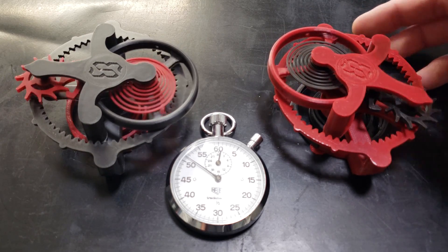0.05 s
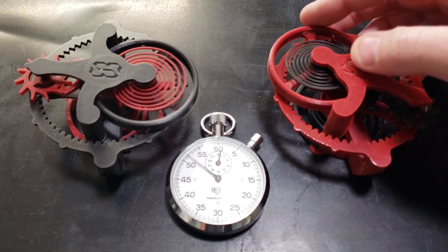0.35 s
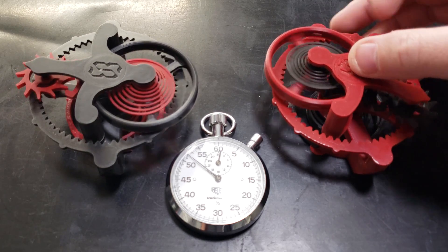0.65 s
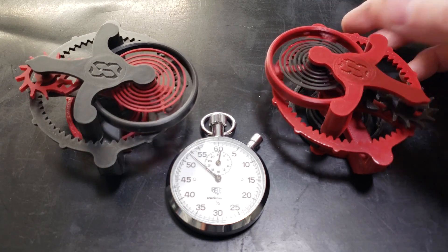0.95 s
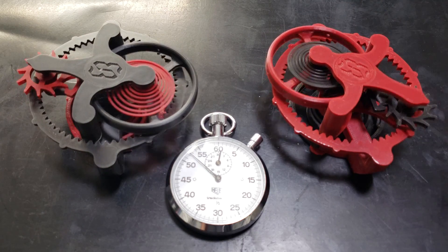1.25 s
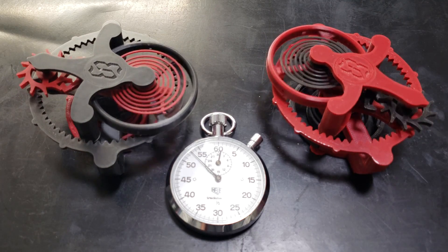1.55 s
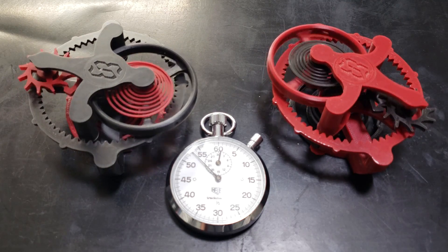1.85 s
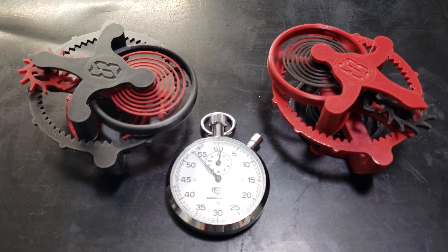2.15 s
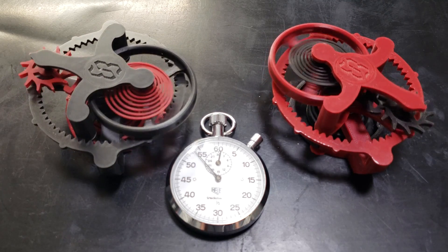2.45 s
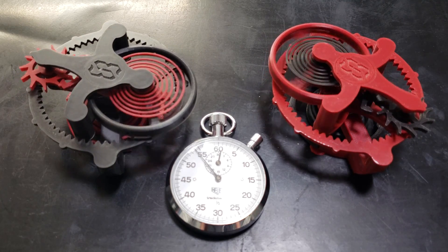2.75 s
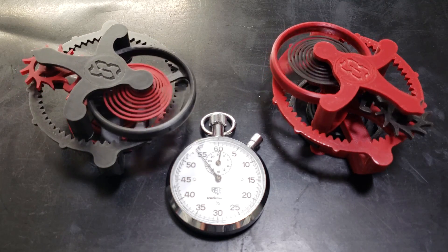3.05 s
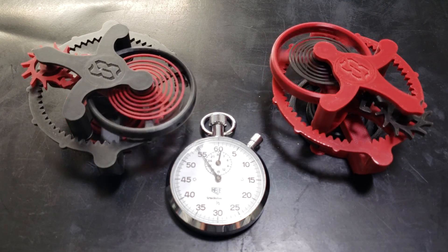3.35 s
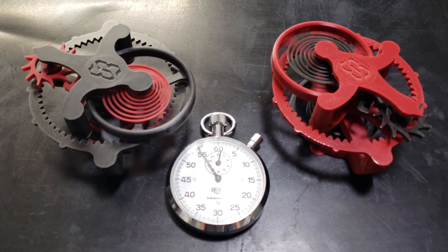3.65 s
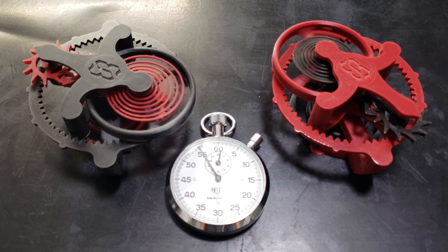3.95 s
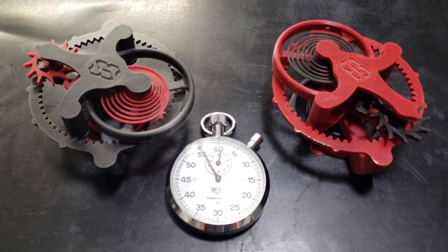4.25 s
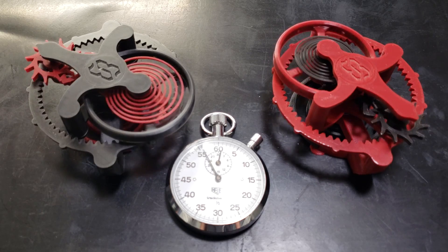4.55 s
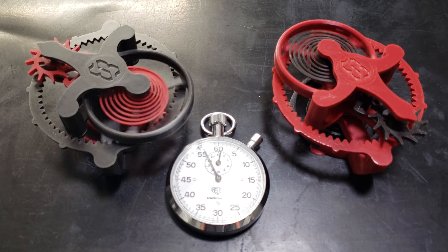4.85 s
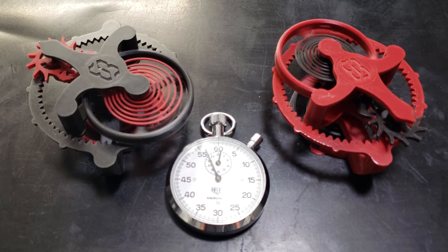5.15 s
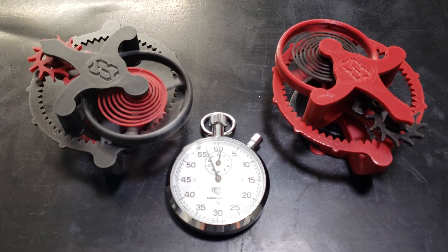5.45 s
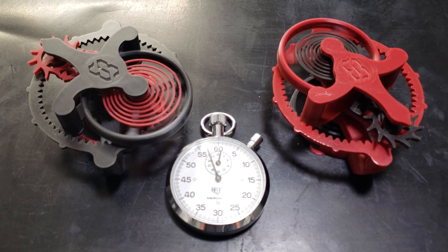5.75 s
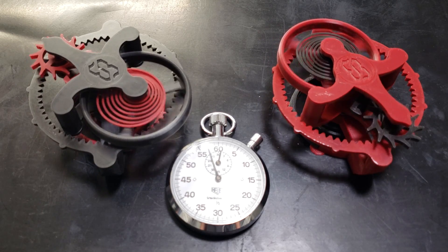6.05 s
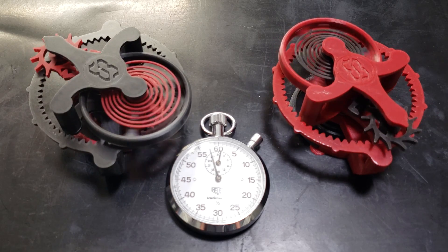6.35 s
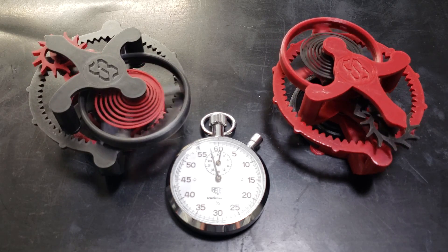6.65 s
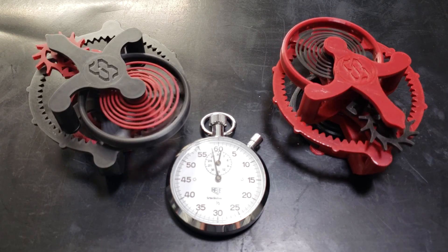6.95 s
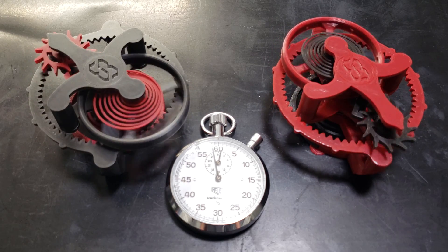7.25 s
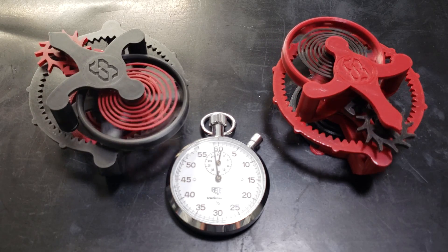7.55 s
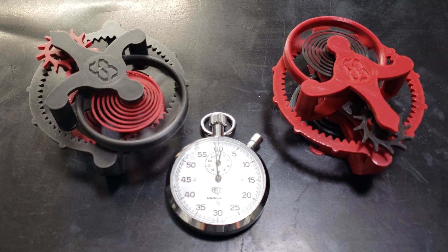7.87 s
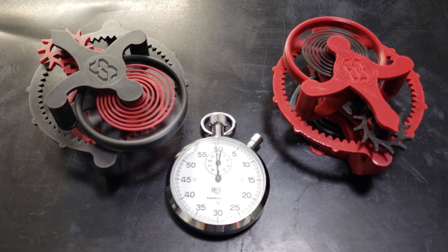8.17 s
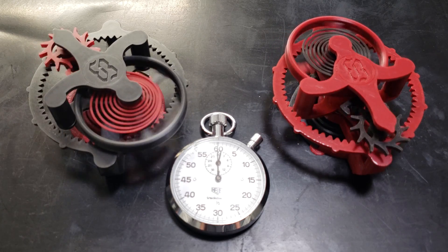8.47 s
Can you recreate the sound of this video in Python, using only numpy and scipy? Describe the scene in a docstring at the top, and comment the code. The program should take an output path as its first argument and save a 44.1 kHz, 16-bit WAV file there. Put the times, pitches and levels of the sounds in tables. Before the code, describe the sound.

Two small plastic clockwork mechanisms tick on a workbench in a small room, heard close up. One, to the left, has a slightly scratchy click; the other, near the centre, joins a moment later, cleaner and a little faster. Each ticks in limping pairs, so the beats drift through each other, knocking lightly on the bench. A soft, low bump comes early, and the ticking carries on over very faint hiss.

```python
"""Two clockwork escapements on a workbench

Two 3D-printed escapements tick in a small room, a grey one on the left, a red one to its right. Their
balance wheels swing at different rates, so the beats drift through each other. Each beat is a light
unlocking click, a short slide and the sharp drop of a tooth on a pallet, which knocks the bench too.
A hand lets go of the red one with a soft bump; rumble, hum and hiss lie far underneath."""
import sys
import numpy as np
from scipy import signal
from scipy.fft import rfft, irfft
from scipy.io import wavfile

SR = 44100
rng = np.random.default_rng(int(sys.argv[2]) if len(sys.argv) > 2 else 0)


def file_out(sig):
    """Save sig as 16-bit WAV at sys.argv[1]."""
    # one column per channel
    cols = np.atleast_2d(sig).T
    # limit, then scale
    lim = np.clip(cols, -1, 1)
    pcm = np.round(lim * 32767).astype(np.int16)
    wavfile.write(sys.argv[1], SR, pcm)


N = 379701
TIME = np.arange(N) / SR
FREQ = np.maximum(np.fft.rfftfreq(4096, 1 / SR), 1)
SIDES = np.array([[1], [-1]])  # sign of a stereo difference: left, right


def grey_escapement():
    """The left movement: a scratchy slide into each tick, and a fork that rattles between beats."""
    # Tooth drops, entry and exit pallet in turn: start_s, level_db, treble_db, rub_db (unlocking)
    beats = [(0.026, 8, 6, -1), (0.247, 3.5, 4, -59), (0.622, 7, 7.5, 2), (0.843, 5, 5, -34),
             (1.22, 12, 14.5, -1), (1.437, 2.5, -3, 0), (1.812, 3, -1.5, 1.5), (2.037, 7.5, 9.5, -23),
             (2.418, 8.5, 11, -1.5), (2.633, 4.5, 9.5, -24), (3.009, 5, 12.5, 4), (3.229, 3.5, 8, -39),
             (3.609, 6, 2.5, -1), (3.821, 3, 3, -2.5), (4.193, 6.5, 4.5, 6), (4.412, 3, 8.5, -1),
             (4.783, 6, 5, 1.5), (5.005, 2.5, 0, -24), (5.384, 10, 13, 3), (5.601, 0.5, 6, -24.5),
             (5.981, 3.5, 3.5, 4), (6.195, 6.5, 5.5, -24), (6.568, 4, 3.5, -2), (6.791, 6, 6, -29),
             (7.168, 7.5, 5.5, 1), (7.387, 4, 3, -15), (7.766, -2.5, -1.5, -2), (7.976, 3, 1.5, -18),
             (8.366, 5.5, 3, 4), (8.571, 9.5, 9.5, -32)]
    # The balance meets the fork, then the fork frees the tooth: lead_s, level_db
    unlock = [(.02, -19.5), (.008, -13)]
    # Broad colour of the plastic frame: freq_hz, gain_db
    body = [(200, -45.5), (1000, -27.5), (2000, -19.5), (3000, -21.5), (4200, -3.5), (6000, -7),
            (7500, -1.5), (8700, -9.5), (10500, -2.5), (13500, -9.5), (15300, 2), (16500, -29)]
    # Resonances of fork and escape wheel: pitch_hz, width_hz, boost_db
    modes = [(3820, 430, 1.5), (5520, 410, 6.5), (12120, 570, 13.5), (16000, 1000, 3.5)]
    clicks = fork_clicks(beats, unlock, slowing_per_s=0.0035, treble_db=-0.5)
    clicks += swing_clicks(beats, level_db=-26.5, treble_db=15, sag_db_per_s=1.5)
    ticks = escapement(beats, clicks, body, modes, ring_t60=0.016, click_t60=0.014, treble_ring=0.75,
                       slide_s=0.0031, slide_gain_db=-12.5, chatter_db=5)
    knocks = kicks(beats, entry_db=-30.5, exit_db=-38.5, sag_db_per_s=0.37, dullness=0.49)
    clacks = kicks(beats, entry_db=-17, exit_db=-20, sag_db_per_s=0.67, dullness=0.18)
    thuds = bench(beats, knocks, clacks, clack_t60=0.034, swell_s=0.0047)
    return place(undb(-4.5) * ticks + thuds, pan_db=7.5, late_s=.00022)


def red_escapement():
    """The movement near the centre: cleaner ticks with hardly any slide."""
    # Tooth drops, entry and exit pallet in turn: start_s, level_db, treble_db, rub_db (unlocking)
    beats = [(0.677, 7.5, -3, -5), (0.864, 3, -0.5, -17.5), (1.24, 8.5, 3, -8), (1.421, 5.5, 9, -25.5),
             (1.791, 8, 9, 1.5), (1.972, 4, 5, 3.5), (2.347, 7.5, 3.5, 1), (2.527, 2, -1.5, 1.5),
             (2.9, 5, 2, 1), (3.072, 3.5, -1, 1), (3.45, 7, 4, -1.5), (3.608, 1, 0, -7),
             (3.988, 0.5, 0.5, 3), (4.147, 2.5, 2, -3.5), (4.529, 5, -0.5, 3.5), (4.688, 4.5, 1.5, -23),
             (5.066, 3, 1.5, 0), (5.226, 4, 4, -2), (5.61, 7, 1, 2), (5.763, 4.5, 5.5, 2),
             (6.15, 2.5, -4.5, 0.5), (6.298, 4, 5, -28), (6.69, 1.5, -3, 3), (6.831, 3, 5.5, -12),
             (7.228, 0.5, -7.5, -10), (7.367, 0.5, 0, -9), (7.773, 4.5, -1, -6), (7.904, -1.5, 1, -26),
             (8.309, 7.5, 3.5, -4.5), (8.446, 3.5, -1, 1.5)]
    # The two unlocking clicks: lead_s, level_db
    unlock = [(.025, -24.5), (.0095, -16)]
    # Broad colour of the plastic frame: freq_hz, gain_db
    body = [(200, -35), (1000, -39), (2000, -22), (3000, -24), (4500, -9), (6000, -7.5), (7500, -4.5),
            (8700, -2), (10500, 1), (13500, 6), (15300, 1), (16500, -12)]
    # Resonances of fork and escape wheel: pitch_hz, width_hz, boost_db
    modes = [(6970, 570, 4.33), (10300, 490, 2.4), (11615, 270, 9), (12790, 450, 8), (15050, 400, 1)]
    clicks = fork_clicks(beats, unlock, slowing_per_s=0.061, treble_db=-12.5)
    ticks = escapement(beats, clicks, body, modes, ring_t60=0.02, click_t60=0.015, treble_ring=0.54,
                       slide_s=0.0012, slide_gain_db=-25.5, chatter_db=2.5)
    knocks = kicks(beats, entry_db=-32, exit_db=-27.5, sag_db_per_s=1.67, dullness=0.36)
    clacks = kicks(beats, entry_db=-18.5, exit_db=-17, sag_db_per_s=0.93, dullness=0.22)
    thuds = bench(beats, knocks, clacks, clack_t60=.03, swell_s=0.0079)
    return place(undb(-1) * ticks + thuds, pan_db=0.5, late_s=-.00001)


def escapement(beats, clicks, body, modes, ring_t60, click_t60, treble_ring,
               slide_s, slide_gain_db, chatter_db):
    """Teeth strike two pallets in turn; each blow rings a dense cloud of short plastic modes."""
    t = np.arange(-SR // 100, SR // 30) / SR
    treble = np.clip(np.log2(bin_hz(len(t)) / 6000), 0, 1)
    own_ring = rng.standard_normal((3, 2, len(t)))  # entry pallet, exit pallet, fork
    alike, spread, rise_s = .12, .45, .0005
    peaks_db = sum(db / (1 + (2 * (FREQ - hz) / width) ** 2) for hz, width, db in modes)
    frame = response(curve(body) + peaks_db)

    def blow(part, t60, treble_db, slide_db):
        """One contact: the tooth slides with growing force, lands, and the part rings."""
        grain = np.sqrt(alike) * own_ring[part] + np.sqrt(1 - alike) * rng.standard_normal((2, len(t)))
        ridges = t[::SR // 2000]  # print ridges make the tooth chatter, about twice a millisecond
        chatter = undb(chatter_db * np.interp(t, ridges, rng.standard_normal(len(ridges))))
        slide = undb(slide_db) * unit(np.exp(-np.abs(t) / slide_s) * (t < 0) * chatter ** 2)
        landing = np.clip(t / rise_s, 0, 1) * chatter
        # plastic damps its treble sooner than its middle
        low = rfft(grain * (unit(fade(t, t60) * landing) + slide))
        high = rfft(grain * (unit(fade(t, t60 * treble_ring) * landing) + slide))
        spectrum = (low * (1 - treble) + high * treble) * undb(treble_db * treble)
        mid, side = irfft(spectrum, len(t))
        # the frame radiates a little differently to each side
        return unit(through(mid + spread * SIDES * side, frame))

    out = np.zeros((2, N))
    for k, (s, db, treble_db, rub_db) in enumerate(beats):
        add(out, s + t[0], undb(db) * blow(k % 2, ring_t60, treble_db, slide_gain_db + rub_db))
    for s, db, treble_db in clicks:
        add(out, s + t[0], undb(db) * blow(2, click_t60, treble_db, slide_db=-11.5))
    return out


def fork_clicks(beats, unlock, slowing_per_s, treble_db):
    """Cues for the light clicks before each drop; their lead grows as the balance loses speed."""
    scatter_db, lead_scatter = 5, 0.067
    clicks = []
    for s, _, _, rub_db in beats:
        for lead_s, db in unlock:
            early, force = rng.standard_normal(2)
            start_s = s - lead_s * (1 + slowing_per_s * s + lead_scatter * early)
            clicks.append((start_s, db + rub_db + scatter_db * force, treble_db))
    return clicks


def swing_clicks(beats, level_db, treble_db, sag_db_per_s):
    """Cues for the free swing shaking the fork: after each drop and, ever fainter, before entry drops."""
    after_s, before_s, scatter_db = .098, .089, 5
    outward = [(s + after_s, level_db) for s, *_ in beats]
    back = [(s - before_s, level_db - sag_db_per_s * s) for s, *_ in beats[2::2]]
    return [(s, db + scatter_db * rng.standard_normal(), treble_db)
            for s, db in outward + back if s < N / SR]


def kicks(beats, entry_db, exit_db, sag_db_per_s, dullness):
    """Each drop's push on the frame in dB: more for a heavy, dull blow, less as the spring unwinds."""
    return [(exit_db if k % 2 else entry_db) + dullness * (db - treble_db) - sag_db_per_s * s
            for k, (s, db, treble_db, _) in enumerate(beats)]


def bench(beats, knocks_db, clacks_db, clack_t60, swell_s):
    """Each drop makes the whole frame clack and kicks the bench through the feet."""
    # Modes of the bench top and each pallet's drive on them: pitch_hz, t60_s, entry_db, exit_db
    top_modes = [(113, 0.2, -5, -4), (152.5, 0.3, -5, -4.5), (220, 0.17, -10.5, -8.5),
                 (376.3, 0.14, -13, -9), (476, 0.049, -8.5, 3.5), (757, 0.15, -9, -10),
                 (944.4, 0.061, -5.5, -9.5), (1046, 0.03, 0.5, -4.5), (1574, 0.045, 3.5, 2.5),
                 (1994, 0.064, -2.5, -1.5)]
    # Hollow clack of the frame: freq_hz, gain_db
    clack_colour = [(100, -12), (500, -14.5), (1200, -12), (2200, -8), (3000, -2), (3900, -0.5),
                    (4700, -0.5), (7000, -28.5)]
    t = np.arange(SR // 4) / SR
    hollow = response(curve(clack_colour))
    clack_envelope = fade(t, clack_t60) * np.clip(t / 0.00048, 0, 1)
    out = np.zeros((2, N))
    for k, (s, *_) in enumerate(beats):
        ring = 0
        for hz, t60, *pallet_db in top_modes:
            # the cage turns, so every blow meets the modes differently
            size, detune, angle, start = rng.standard_normal(4)
            phase = 2 * np.pi * hz * (1 + .015 * detune) * t + np.pi * start
            skew = SIDES * angle * min(hz / 2000, .6)
            ring += undb(pallet_db[k % 2] + 2 * size) * unit(np.sin(phase + skew) * fade(t, t60))
        knock = unit(ring * np.clip(t / swell_s, 0, 1))
        mid, side = rng.standard_normal((2, len(t))) * clack_envelope
        clack = unit(through(mid + .5 * SIDES * side, hollow))
        add(out, s, undb(knocks_db[k]) * knock + undb(clacks_db[k]) * clack)
    return out


def hand_bumps(swell_s, t60):
    """Soft, deep thuds of the whole bench as the hand lets go."""
    # Nudges of the bench: start_s, level_db
    bumps = [(1.243, -27.5), (1.433, -42.5)]
    # Their bass-heavy colour: freq_hz, gain_db
    colour = [(25, -30), (55, 0.5), (120, -6.5), (180, -16.5), (300, -18.5), (800, -38.5)]
    t = np.arange(SR // 2) / SR
    out = np.zeros((2, N))
    for s, db in bumps:
        push = rng.standard_normal(len(t)) * fade(t, t60) * np.minimum(t / swell_s, 1)
        add(out, s, undb(db) * unit(through(push, response(curve(colour)))))
    return out


def room(send, wet_db, directions):
    """Weak scatter from things on the bench, then the walls answer."""
    # Tone of the reverb: freq_hz, gain_db
    colour = [(150, 5), (1000, 9), (3000, 2), (5000, -0.5), (7000, -6.5), (9500, -1.5), (12000, -5.5),
              (15000, -2.5), (16300, -16.5)]
    # Decay by band: centre_hz, t60_s
    decays = [(200, 0.21), (1500, 0.24), (5000, 0.3), (9000, 0.31), (15000, 0.23)]
    t = np.arange(SR // 2) / SR
    centres, t60s = np.transpose(decays)
    bands = [np.interp(np.log(bin_hz(len(t))), np.log(centres), row) for row in np.eye(len(centres))]
    build_up = np.interp(t, [.002, .003, .008, .011, .014, .018], [0, .55, .55, 1, .8, 1.1])
    # the turning cages aim each beat at other walls
    turns_s = np.arange(0, N / SR + .1, .07)
    aim = np.array([np.interp(TIME, turns_s, rng.standard_normal(len(turns_s)))
                    for _ in range(directions)])
    aim /= np.sqrt(np.sum(aim ** 2, axis=0))
    out = np.zeros((2, N))
    for weight in aim:
        noise = rfft(rng.standard_normal((2, len(t))))
        tail = sum(irfft(noise * band, len(t)) * fade(t, t60) for band, t60 in zip(bands, t60s))
        out += through(send * weight, unit(tail * build_up))
    return undb(wet_db) * through(out, response(curve(colour)))


def background(level_db, hum_hz, hum_db):
    """Room tone: a narrow low rumble and a faint hum under a thin, wide hiss."""
    # Shape of the noise: freq_hz, gain_db
    colour = [(20, -28.5), (40, -16.5), (57, -2.5), (80, -0.5), (130, -3.5), (220, -9.5), (400, -20),
              (1000, -29.5), (3000, -34), (8000, -35.5), (12000, -22.5), (16000, -20)]
    hz = bin_hz(N)
    mid, side = rfft(rng.standard_normal((2, N))) * undb(curve(colour, hz))
    air = irfft(mid + SIDES * side * np.clip(hz / 600, .2, 1), N)
    return undb(level_db) * air / air.std() + undb(hum_db) * np.sin(2 * np.pi * hum_hz * TIME)


def place(pair, pan_db, late_s):
    """Pan a source: the left side is pan_db louder, the right hears it late_s later."""
    delay = np.exp(-2j * np.pi * np.fft.rfftfreq(N, 1 / SR) * late_s)
    right = irfft(rfft(pair[1]) * delay, N)
    return np.array([pair[0], right]) * undb(SIDES * pan_db / 2)


def undb(db):
    """Decibels to gain."""
    return 10 ** (np.asarray(db) / 20)


def unit(x):
    """Scale to unit energy."""
    return x / np.sqrt(np.sum(x ** 2))


def bin_hz(n):
    """Spectrum frequencies for n samples, at least 1 Hz."""
    return np.maximum(np.fft.rfftfreq(n, 1 / SR), 1)


def curve(points, hz=FREQ):
    """Read (freq_hz, value) points on a log-frequency axis."""
    point_hz, value = np.transpose(points)
    return np.interp(np.log(hz), np.log(point_hz), value)


def response(db):
    """Minimum-phase impulse response of an EQ curve on FREQ."""
    cepstrum = irfft(np.log(undb(db)))
    half = len(cepstrum) // 2
    cepstrum[1:half] *= 2
    cepstrum[half + 1:] = 0
    return irfft(np.exp(rfft(cepstrum)))[:half]


def through(x, ir):
    """Convolve along time and keep the length."""
    return signal.fftconvolve(np.atleast_2d(x), np.atleast_2d(ir), axes=-1)[:, :x.shape[-1]]


def fade(t, t60):
    """Exponential decay that starts at t = 0."""
    return np.exp(-np.log(1000) * np.maximum(t, 0) / t60) * (t >= 0)


def add(out, start_s, x):
    """Mix x into out from start_s on."""
    i = max(int(start_s * SR), 0)
    out[..., i:i + x.shape[-1]] += x[..., :N - i]


def scene():
    """Both movements on the bench, in the room."""
    grey, red = grey_escapement(), red_escapement()
    # each movement sends its outward side into the room
    echoes = room(undb(-4.5) * grey[0] + red[1], wet_db=-2, directions=7)
    bumps = hand_bumps(swell_s=0.0073, t60=0.32)
    return grey + red + echoes + bumps + background(level_db=-70, hum_hz=58.5, hum_db=-75.5)


def record(dry):
    """The left microphone port is more sensitive and rings in the treble; both sides lose the very top."""
    # Colour of the left port: freq_hz, gain_db
    left_port = [(60, 2.5), (300, 1.5), (1000, 4.5), (3000, 5), (4500, 3), (6000, 8.5), (7000, 10.5),
                 (8300, -2), (12000, -0.5), (15000, -1.5)]
    top_hz = 16300
    ports = np.vstack([through(dry[0], response(curve(left_port))), dry[1]])
    return signal.sosfilt(signal.ellip(8, .2, 70, top_hz, fs=SR, output="sos"), ports)


dry = scene()
out = record(dry)
file_out(out)
```